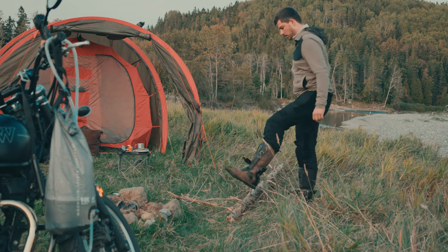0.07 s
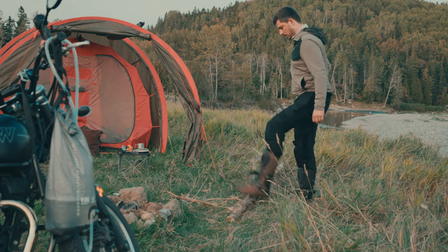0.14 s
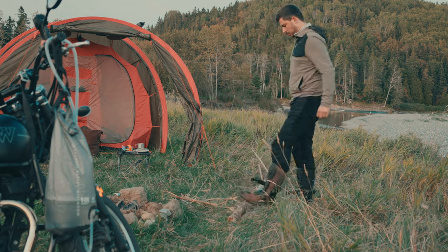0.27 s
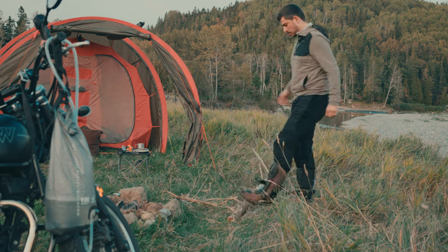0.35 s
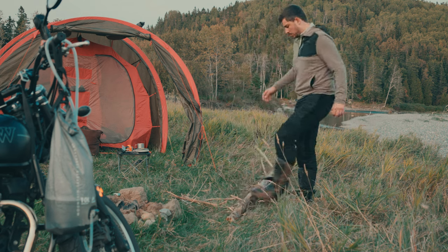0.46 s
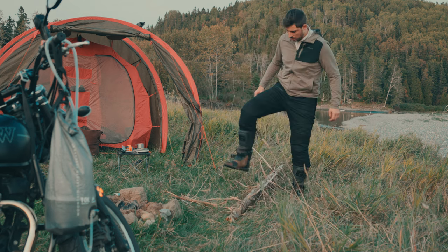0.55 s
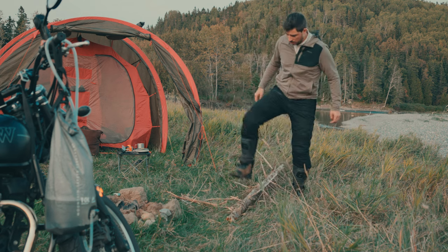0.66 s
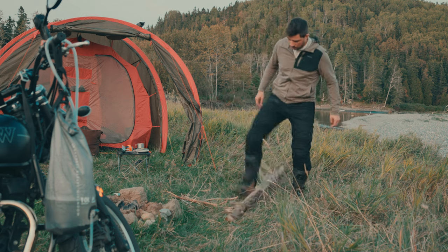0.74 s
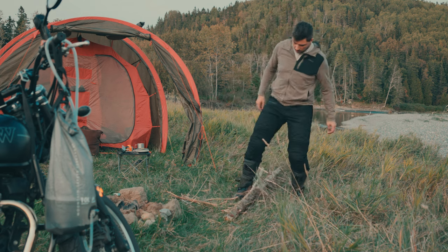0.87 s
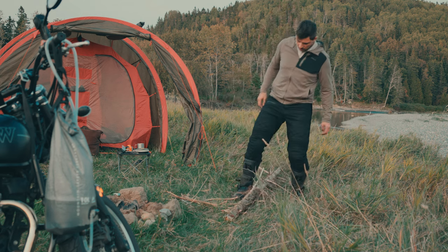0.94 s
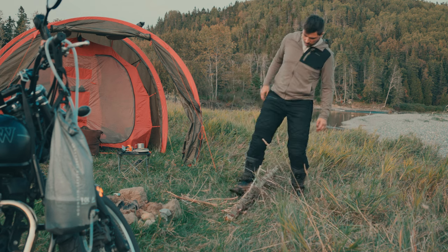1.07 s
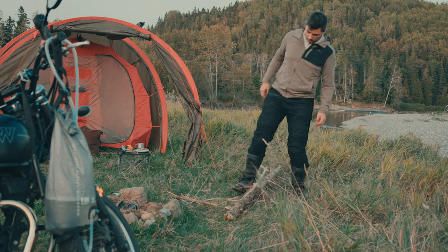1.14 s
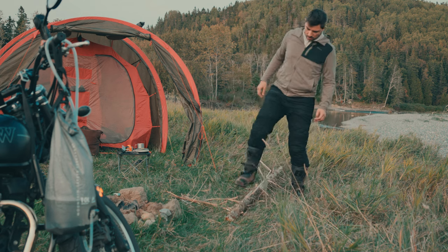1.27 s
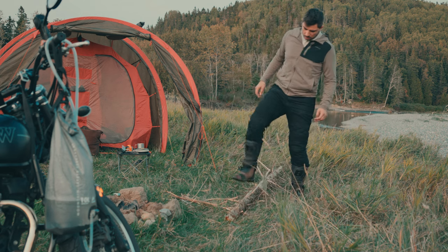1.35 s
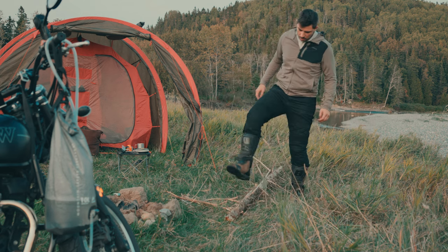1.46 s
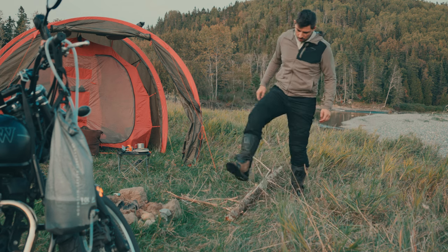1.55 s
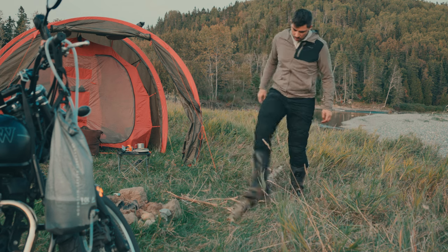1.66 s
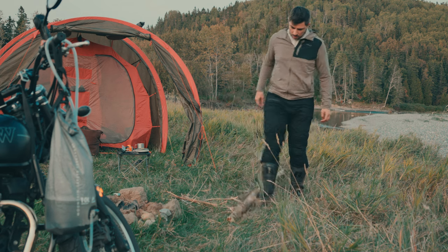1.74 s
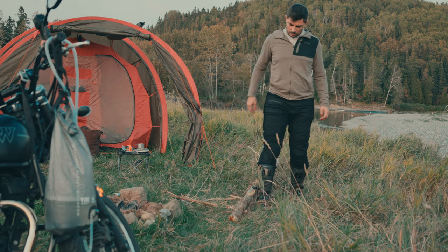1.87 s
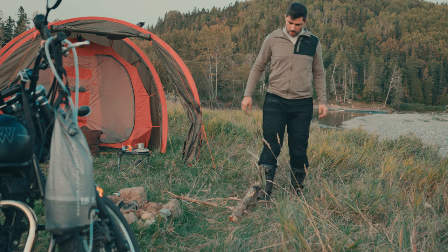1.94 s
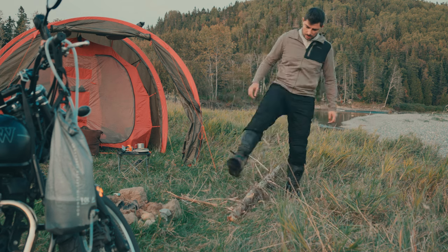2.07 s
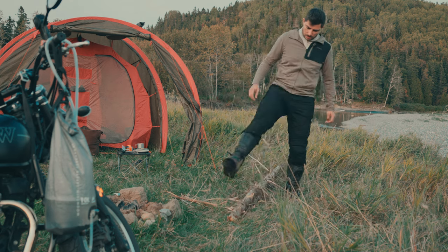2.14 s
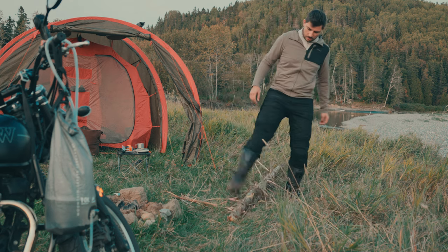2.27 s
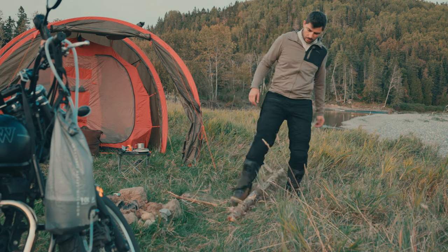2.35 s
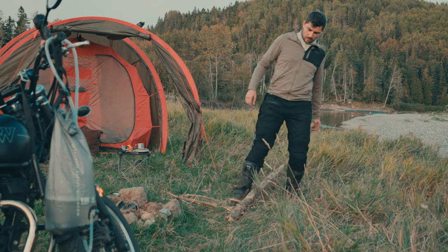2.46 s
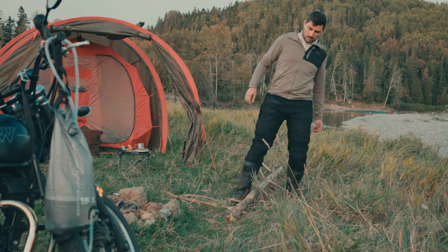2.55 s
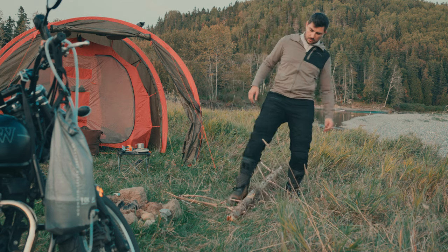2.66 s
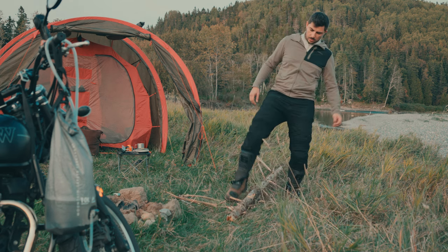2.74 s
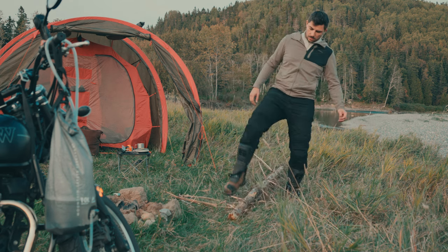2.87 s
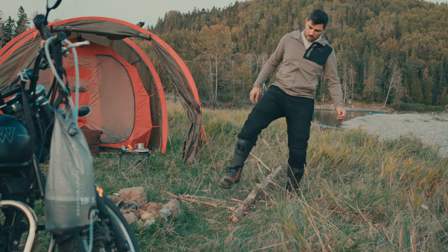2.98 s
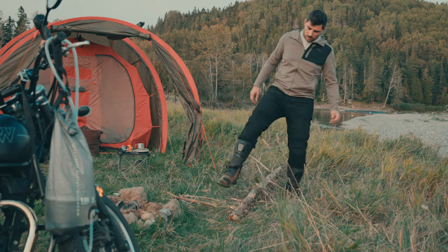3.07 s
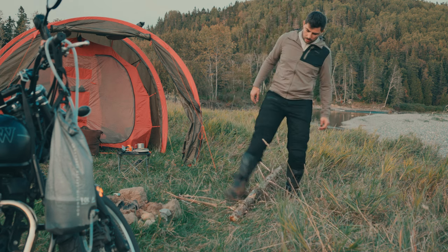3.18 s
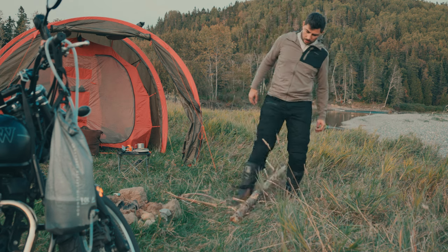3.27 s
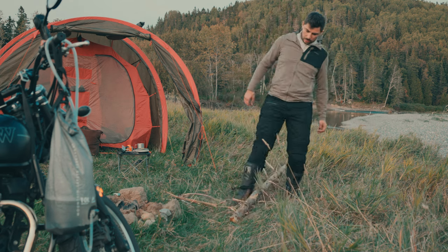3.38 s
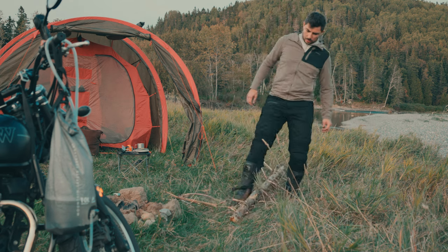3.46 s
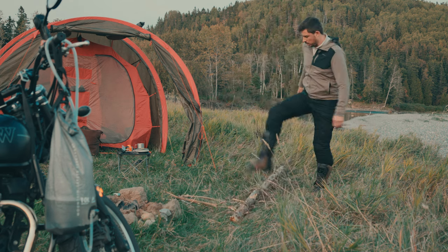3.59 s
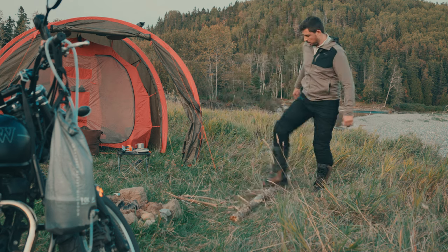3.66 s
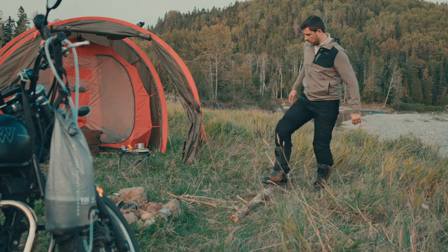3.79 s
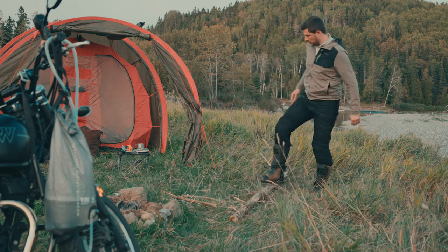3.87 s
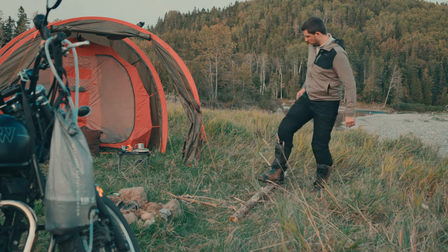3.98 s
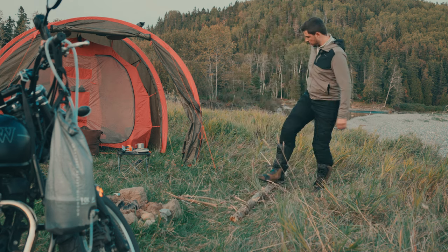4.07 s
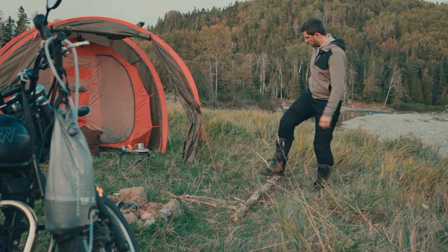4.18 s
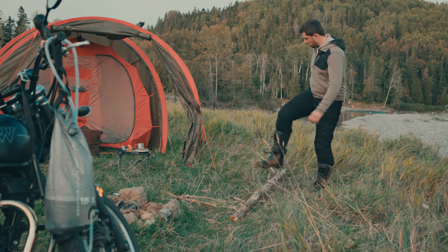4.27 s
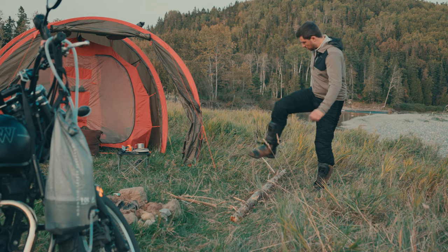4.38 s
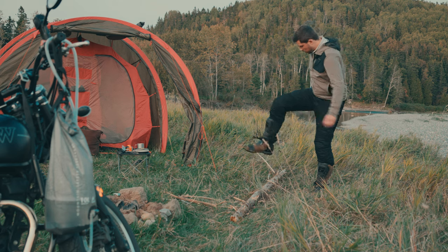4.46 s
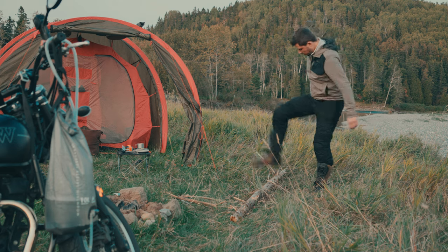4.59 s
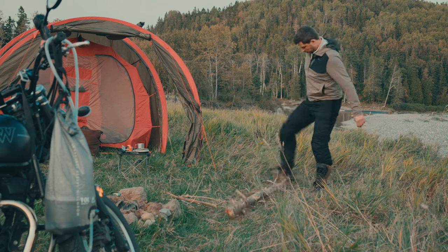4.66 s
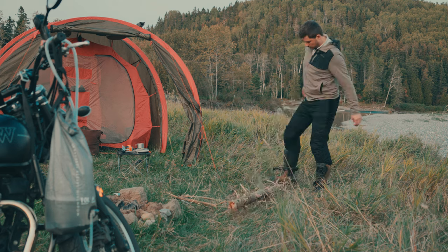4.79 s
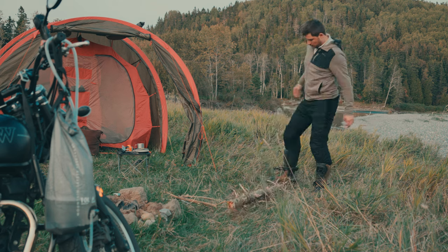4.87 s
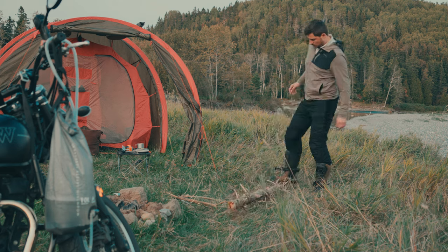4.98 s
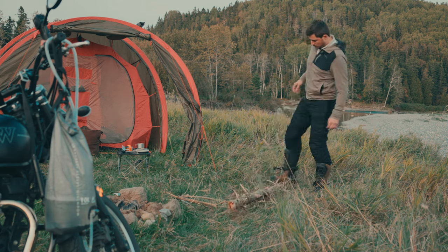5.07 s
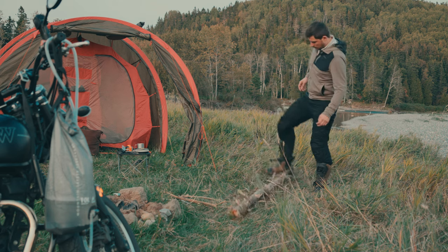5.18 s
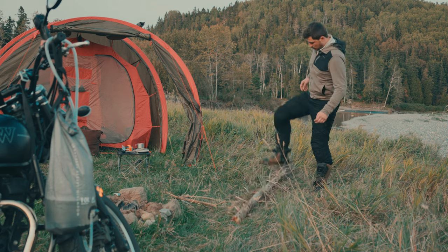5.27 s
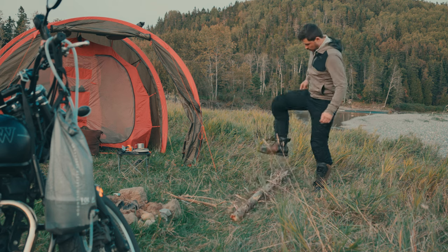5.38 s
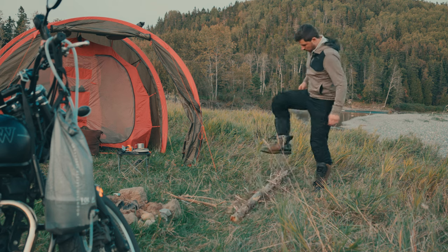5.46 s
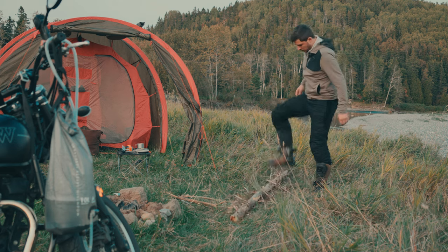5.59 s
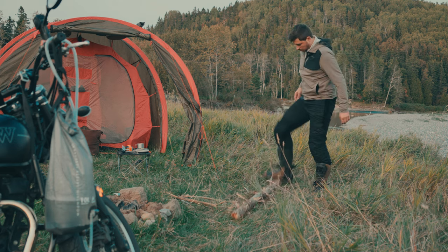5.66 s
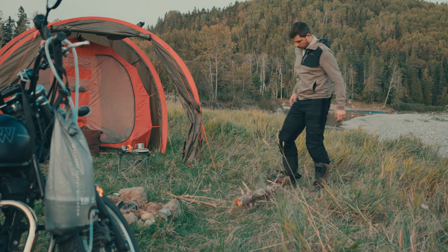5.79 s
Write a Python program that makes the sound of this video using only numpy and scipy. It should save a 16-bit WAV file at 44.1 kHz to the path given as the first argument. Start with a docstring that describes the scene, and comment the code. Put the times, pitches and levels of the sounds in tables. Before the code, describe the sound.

A boot breaks a dry, twiggy log in grass beside a distant river, heard close in open air. Stamps land at about 0.2, 0.75, 1.65, 2.35, 3.25, 3.65, 4.65 and 5.7 seconds. Each is a burst of roughly a tenth of a second: hard, bright snaps of a few milliseconds, splintery crunch, tiny crackles and damped woody knocks with soil thump. The 1.65 stamp is a longer run of snaps; 2.35 is lower and thuddier; 3.65 is the loudest, a hard crack; 4.7 is a dense, powerful cluster; 5.7 is one clean snap with small remnants. The log briefly rings hollow around 1.7, 2.4, 3.3 and 3.7. Small light snaps come near 5.15. Between stamps are soft knocks, faint stalk ticks and grass rustle, clearest near 1.1, 3.9 and 5.25. A smooth quiet river hiss continues throughout, with low wind buffeting that weakens after 3.7.

```python
"""Twigs crack in quick runs as a boot stamps on a dry, twiggy log lying in grass beside a river.
Each crack is noise ringing a twig stub, with a treble click and a splintery crunch.
Knocks are pushes into damped resonances; the log rings in a few decaying sine modes.
Grass is grainy noise that follows the boot, with single stalk ticks on top.
The river is a smooth distant hiss; wind is low noise buffeting the microphone."""
import sys
import numpy as np
from scipy import signal
from scipy.fft import rfft, irfft
from scipy.io import wavfile
from scipy.ndimage import uniform_filter1d

SR = 44100
rng = np.random.default_rng(int(sys.argv[2]) if len(sys.argv) > 2 else 0)


def invert_db(level):
    """Linear amplitude ratio for a level in decibels (20 dB per decade), elementwise."""
    return 10 ** (np.asarray(level, dtype=float) / 20)


def output_pcm(signal):
    """Save a mono or channel-first signal as 16-bit PCM at the path in sys.argv[1].

    Samples are clipped to [-1, 1] before scaling.
    """
    pcm = np.clip(np.atleast_2d(signal).T, -1, 1) * 32767
    wavfile.write(sys.argv[1], SR, np.round(pcm).astype(np.int16))


N = 257102
T = np.arange(N) / SR
BURST = 4096  # samples in one short event

# Stamps of the boot. Each row: start in seconds, length in seconds,
# small-twig peak level in dB before sag and scatter, grass level in dB before its flicker.
STAMPS = [(0.184, .10, -26.5, -50.5), (0.75, .09, -28, -53.5), (1.672, .16, -30, -55.5),
          (2.335, .11, -26.5, -57), (3.235, .11, -29, -58.5), (3.661, .07, -27.5, -52),
          (4.655, .12, -28, -54), (5.70, .07, -34, -50.5)]


def unit(x):
    """Scale to rms 1."""
    return x / np.sqrt(np.mean(x ** 2))


def colour(x, points):
    """Filter by a spectrum of (Hz, relative dB) points, then scale to rms 1."""
    hz, db = np.transpose(points)
    f = np.fft.rfftfreq(len(x), 1 / SR) + 1  # the 1 keeps the logarithm finite
    gain = invert_db(np.interp(np.log(f), np.log(hz), db))
    return unit(irfft(rfft(x) * gain, len(x)))


def curve(rows):
    """Gain over time from (seconds, dB) rows."""
    return invert_db(np.interp(T, *np.transpose(rows)))


def walk(rate):
    """Random levels held 1 / rate seconds and smoothed twice, scaled to rms 1."""
    hold = int(SR / rate)
    steps = rng.standard_normal(N)[np.arange(N) // hold]
    return unit(uniform_filter1d(uniform_filter1d(steps, hold), hold))


def grit(shape, spread_db):
    """Noise whose samples differ widely in size: fibres and stalks letting go one by one."""
    return rng.standard_normal(shape) * invert_db(spread_db * rng.exponential(size=shape))


def ring(x, hz, width_hz):
    """One resonance, gain 1 at its centre."""
    return signal.lfilter(*signal.iirpeak(hz, hz / width_hz, fs=SR), x)


def ring_twice(x, hz, width_hz, broad_hz, second_width_hz):
    """Two resonances in a row, scaled to rms 1."""
    return unit(ring(ring(x, hz, width_hz), broad_hz, second_width_hz))


def add(track, s, burst, db, size=50):
    """Lay a burst on the track, its loudest stretch of size samples as strong as a sine of peak db."""
    power = uniform_filter1d(2 * burst ** 2, size=size)
    i = int(s * SR)
    track[i:i + len(burst)] += (burst * invert_db(db) / np.sqrt(power.max()))[:N - i]


def fade(ms, rise_ms):
    """A smooth rise, then 8 dB lost in every ms milliseconds."""
    t = T[:BURST] * 1000
    return (1 - np.exp(-(t / rise_ms) ** 2)) * invert_db(-8 * t / ms)


def cracks():
    """Tearing fibres ring the twig stub and click broadly; splinters crunch around each break."""
    # The louder twig cracks. Each row: moment in seconds, peak level in dB, stub pitch in Hz,
    # nominal fade in ms (each layer scales it), treble level in dB relative to the peak.
    loud_snaps = [(0.182, -22, 2540, 2, -45), (0.1865, -22.5, 1720, 3.5, -11), (0.191, -25, 2360, 5, -15.5),
                  (0.204, -19.5, 2440, 3.5, -23), (0.2117, -2.5, 3450, 2.5, -18.5),
                  (0.2172, -6.5, 3600, 1.5, -28.5), (0.2282, -16.5, 3310, 4.5, -16),
                  (0.235, -17, 2520, 4.5, -25), (0.282, -29, 3800, 3, -13.5),
                  (0.2894, -33.5, 3810, 2.5, -13), (0.3893, -31, 4100, 1.8, -6.5),
                  (0.7479, -25, 4210, 3, -12.5), (0.761, -24, 2690, 7.5, -23),
                  (0.7834, -17.5, 2870, 3.5, -21.5), (0.7904, -22.5, 3000, 6, -16),
                  (0.7982, -2, 3740, 3, -9.5), (0.8125, -13, 3950, 2, -17), (0.8181, -19.5, 2910, 3, -24.5),
                  (0.8585, -34.5, 3410, 2, -15), (1.6488, -35, 1330, 4, -37), (1.657, -31, 1610, 3, -38),
                  (1.6709, -15.5, 3400, 2.5, -19), (1.68, -25, 3840, 3.0, -13),
                  (1.693, -21.5, 3130, 2.5, -24.5), (1.724, -23.5, 3330, 1.8, -29.5),
                  (1.7316, -9, 3450, 1.5, -31), (1.7367, -15.5, 3340, 3.0, -13),
                  (1.744, -8, 3260, 1.5, -24), (1.7596, -17.5, 3280, 7, -15.5),
                  (1.7763, -16.5, 2810, 3.5, -14.5), (1.7798, -13, 2470, 2.5, -21),
                  (1.7946, -17, 1660, 6, -16.5), (1.8118, -25.5, 2150, 3, -24),
                  (2.336, -22.5, 1150, 3, -35.5), (2.3565, -19, 2920, 1.5, -19),
                  (2.3614, -10, 2100, 2, -29.5), (2.377, -22.5, 2560, 4, -22),
                  (2.3901, -17.5, 1280, 4.5, -22), (2.3961, -21.5, 1210, 7.5, -8.5),
                  (2.4205, -24, 3130, 2, -4.5), (2.478, -35, 1470, 1.9, -30), (3.2364, -24, 1100, 4, -37),
                  (3.244, -25.5, 2500, 1, -16.5), (3.254, -26, 3030, 5, -21.5),
                  (3.2633, -22, 3700, 5, -19.5), (3.2843, -9.5, 2800, 1.5, -25.5),
                  (3.288, -15.5, 2500, 1.5, -22.5), (3.3011, -25, 2270, 4, -23),
                  (3.3564, -33.5, 2840, 3, -22.5), (3.6635, -29, 2440, 9, -16), (3.673, -16, 2500, 3, -22),
                  (3.6754, 0, 3170, 3.5, -21), (3.6814, -9, 4300, 0.5, -14.5), (3.684, -10, 2580, 8, -23),
                  (3.6929, -13.5, 2400, 7.5, -16), (3.71, -18, 3500, 2.2, -21.5),
                  (4.6402, -34, 2700, 3, -17), (4.6614, -22.5, 4160, 2.5, -15.5),
                  (4.6748, -26, 4550, 2.5, -10), (4.684, -24.5, 2780, 2.5, -13),
                  (4.7032, -13, 1500, 4.5, -22), (4.7076, -1.5, 3860, 3, -13.5),
                  (4.7153, -14, 2350, 6.5, -11.5), (4.721, -16, 3000, 8, -11), (4.728, -2.5, 3570, 2, -17),
                  (4.735, -16.5, 1405, 4.5, -19.5), (4.7475, -8, 3500, 3, -20),
                  (4.7512, -9.5, 2640, 2.5, -15.5), (4.7623, -22.5, 2910, 4, -15),
                  (4.86, -34, 2160, 1, -23.5), (5.1315, -24.5, 4500, 1.2, -16.5),
                  (5.1495, -27, 4500, 0.5, -14.5), (5.1622, -31.5, 4040, 1.5, -15),
                  (5.7004, -20, 2300, 4, -18), (5.705, -0.5, 2690, 1.6, -15.5),
                  (5.7134, -24, 2670, 2, -10.5), (5.718, -24, 2470, 5, -11.5), (5.756, -30, 3850, 3, -3),
                  (5.7654, -17.5, 2850, 1.8, -20), (5.7993, -37.5, 1480, 4, -6.5)]
    # Spectrum of the crunch. Each row: frequency in Hz, relative level in dB per Hz.
    splinter_tone = [(150, -7.5), (400, -3), (1000, -2), (1600, -5.5), (3000, -0.5), (5000, -7),
                     (7000, -19), (16000, -36)]
    body_db = -9  # relative to the stub before both are levelled together
    snaps = [*loud_snaps, *twigs()]
    out, load = np.zeros(N), np.zeros(N)
    treble = signal.butter(2, [7000, 14000], "band", fs=SR, output="sos")
    for (s, db, hz, ms, top_db), fibres in zip(snaps, grit((len(snaps), BURST), 3.0)):
        start = s - 0.001
        tear = fibres * fade(0.51 * ms, 0.78)
        stub = ring_twice(tear, hz, 0.29 * hz, hz, 1.37 * hz)
        body = ring_twice(tear, 2500, 2200, 2500, 3500)
        add(out, start, stub + invert_db(body_db) * body, db)
        click = signal.sosfilt(treble, fibres[::-1] * fade(0.5 * ms, 0.62))
        add(out, start, click, db + top_db)
        # the crunch grows more slowly than the crack is loud; short clean breaks leave less of it
        crunch_db = 0.68 * db - 24 + 7 * np.log10(ms / 3)
        add(load, s - 0.006, fade(11, 4.9), crunch_db)  # strain begins before the break
    return out + load * colour(grit(N, 2.4), splinter_tone)


def twigs():
    """Small twigs give way at random moments of each stamp, weaker towards its end."""
    per_second = 40
    sag_db, scatter_db = -8, 2.5
    middle_hz, spread_octaves = 2500, 0.35
    middle_ms, middle_treble_db = 4.5, -20.5  # nominal fade and relative treble, as in the crack rows
    rows = []
    for s, length, db, _ in STAMPS:
        count = int(np.ceil(per_second * length))
        places = (np.arange(count) + rng.random(count)) / count  # 0 to 1 through the stamp
        chances = rng.standard_normal((count, 4)).clip(-2, 2)
        for place, (a, b, c, d) in zip(places, chances):
            peak_db = db + sag_db * place + scatter_db * a
            hz = middle_hz * 2 ** (spread_octaves * b)
            ms = middle_ms * 2 ** (0.6 * c)
            rows.append((s + length * place, peak_db, hz, ms, middle_treble_db + 5 * d))
    return rows


def knocks():
    """A rough quarter-cycle push into a damped low resonance; soil thumps beneath, bark scrapes above."""
    # Knocks of boot and log. Each row: start in seconds, peak level in dB, pitch in Hz,
    # time in ms for the push's roughness to lose 8 dB.
    hits = [(0.1824, -20, 450, 11.5), (0.2115, -14.5, 900, 11), (0.545, -41.5, 150, 9),
            (0.7449, -31, 150, 25), (0.7622, -25, 370, 13), (0.7828, -27.5, 623, 7.5),
            (0.7966, -12, 650, 8), (0.847, -33, 160, 10), (1.0911, -30, 270, 6.5), (1.657, -29, 620, 11),
            (1.6715, -29.5, 430, 27), (1.6972, -23.5, 404, 25), (1.747, -32, 260, 27),
            (1.7788, -20.5, 280, 26), (2.0605, -33.5, 150, 9.1), (2.3367, -15, 402, 8),
            (2.3562, -16.5, 170, 12.3), (2.3787, -29, 240, 25), (2.3915, -16, 800, 7),
            (2.4206, -22, 280, 18), (2.479, -23.5, 210, 8), (2.5193, -34.5, 240, 11), (2.792, -42, 700, 9),
            (2.875, -39, 900, 10), (3.2153, -33.5, 260, 3), (3.2361, -17, 800, 9), (3.2835, -17, 800, 6),
            (3.2849, -18, 297, 23.5), (3.3375, -27.5, 343, 7), (3.3632, -25.5, 240, 7.5),
            (3.575, -39.5, 171, 8.5), (3.6643, -29, 290, 25), (3.6905, -20.5, 390, 12.5),
            (3.775, -40, 170, 9), (4.6648, -29.5, 610, 14), (4.7048, -12.5, 570, 13),
            (4.7257, -17, 510, 11.5), (5.703, -28, 410, 7.5), (5.7413, -40, 420, 6.4),
            (5.763, -32.5, 637, 13), (5.7998, -40, 430, 6)]
    soil_db, bark_db = -3, -8  # relative to the wood; bark also grows with pitch
    out = np.zeros(N)
    for (s, db, hz, ms), jolt in zip(hits, rng.standard_normal((len(hits), BURST))):
        push = fade(250 / hz, 120 / hz) + 0.64 * jolt * fade(ms, 0.65)
        wood = ring_twice(push, hz, 0.9 * hz, hz, 2.5 * hz)
        soil = ring_twice(push, 230, 260, 210, 450)
        scrape = jolt * fade(0.63 * ms, 0.98)
        bark = ring_twice(scrape, 1.9 * hz, 1.3 * hz, 1.9 * hz, 2.5 * hz)
        knock = wood + invert_db(soil_db) * soil + invert_db(bark_db) * hz / 450 * bark
        add(out, s, knock, db, size=176)
    return out


def trunk():
    """The log's few hollow bending modes; where the boot pins it decides which one rings most."""
    # Blows that set the log ringing. Each row: start in seconds,
    # peak level in dB of a mode at the favoured pitch, favoured pitch in Hz.
    blows = [(1.703, -22, 128), (2.398, -21, 279), (2.885, -41, 279), (3.29, -23, 279), (3.358, -37.5, 279),
             (3.688, -22.5, 418)]
    # Bending modes. Each row: frequency in Hz, time in seconds to decay by 60 dB.
    modes = [(128, 0.083), (279, 0.16), (418, .08)]
    off_mode_db_per_octave = -25
    out, t = np.zeros(N), T[:2 * BURST]
    for s, db, best_hz in blows:
        for hz, t60 in modes:
            mode_db = db + off_mode_db_per_octave * abs(np.log2(hz / best_hz))
            envelope = (1 - np.exp(-t / 0.0046)) * invert_db(-60 * t / t60)
            add(out, s, envelope * np.sin(2 * np.pi * hz * t), mode_db, size=176)
    return out


def grass():
    """A fine grainy rustle follows the boot, with a few single stalk ticks."""
    # Faint stalk ticks. Each row: start in seconds, peak level in dB.
    ticks = [(0.3114, -42.5), (0.3174, -42), (0.3481, -44), (0.4695, -49), (0.735, -40), (1.039, -48.5),
             (1.075, -49), (1.138, -41), (1.1474, -46), (2.0494, -53), (2.8724, -51.5), (3.758, -44),
             (3.7858, -44), (3.841, -48), (4.2018, -49), (4.2662, -51)]
    # Spectrum of the rustle. Each row: frequency in Hz, relative level in dB per Hz.
    rustle_tone = [(1000, -14), (2500, 0.5), (5000, 1.5), (8000, -4.5), (12000, -8), (16000, -9)]
    flicker = invert_db(2.5 * walk(45))
    out = brushing() * flicker * colour(grit(N, 2.5), rustle_tone)
    for (s, db), stalk in zip(ticks, rng.standard_normal((len(ticks), BURST))):
        add(out, s, ring(stalk * fade(1.1, 0.5), 4500, 7000), db)
    return out


def brushing():
    """Grass is crushed during a stamp, springs back fast and settles slowly; sweeps swell and fade."""
    # The boot sweeps through the grass between stamps. Each row: middle in seconds,
    # half length in seconds (gain down to 1/e), level in dB before the flicker.
    sweeps = [(0.482, 0.066, -68), (1.12, 0.13, -65.5), (2.0, .06, -74), (2.881, .07, -71),
              (3.19, 0.034, -74), (3.91, 0.068, -62.5), (4.208, .07, -73), (4.98, .1, -74),
              (5.26, 0.14, -62.5), (5.45, 0.063, -72.5)]
    still_db, settle_db = -85, -16  # settling is relative to the stamp
    rise_s, drop_s, settle_s = 0.005, 0.03, 0.18
    gain = invert_db(still_db)
    for s, half, db in sweeps:
        gain = gain + invert_db(db) * np.exp(-((T - s) / half) ** 2)
    for s, length, _, db in STAMPS:
        before = np.maximum(s - T, 0)
        after = np.maximum(T - s - length, 0)
        back = np.exp(-after / drop_s) + invert_db(settle_db) * np.exp(-after / settle_s)
        gain = gain + invert_db(db) * np.exp(-before / rise_s) * back
    return gain


def river():
    """Distant smooth hiss that swells slightly: coloured noise with slow and quicker level drift."""
    # Spectrum of the hiss. Each row: frequency in Hz, relative level in dB per Hz.
    hiss_tone = [(120, -38.5), (200, -8), (400, -5), (800, 0), (1600, -3), (2560, -2), (4270, -12.5),
                 (5200, -14), (6700, -30.5), (9000, -36.5), (16000, -46)]
    level_db = -51 + 0.72 * walk(1.5) + 0.5 * walk(12)
    return invert_db(level_db) * colour(grit(N, 0.97), hiss_tone)


def wind():
    """Low buffeting of the microphone; stronger gusts flutter higher."""
    # Gusts on the microphone. Each row: time in seconds, level of the low rumble in dB.
    gust = curve([(0.0, -36), (0.2, -34), (0.5, -34.5), (0.7, -38), (1.02, -41), (1.4, -38.5), (1.7, -35.5),
                  (2.1, -35.5), (2.6, -35.5), (3.2, -36), (3.55, -37), (3.74, -45), (4.1, -46), (4.27, -40),
                  (4.45, -46.5), (4.9, -39), (5.4, -42), (5.83, -50)])
    # Spectrum of the rumble. Each row: frequency in Hz, relative level in dB per Hz.
    rumble_tone = [(10, -31.5), (20, -8.5), (32, -2), (45, -0.5), (58, -6.5), (80, -24.5), (120, -38),
                   (200, -46.5), (300, -62.5), (500, -90)]
    rumble = colour(rng.standard_normal(N), rumble_tone)
    flutter_tone = [(30, -29.5), (62, 0.5), (85, -7.5), (130, -20), (300, -51.5), (700, -110)]
    flutter = colour(rng.standard_normal(N), flutter_tone)
    flutter_gain = invert_db(-9.0 + 2.5 * walk(6)) * unit(gust ** 0.54)
    return gust * (rumble + flutter_gain * flutter)


def scene():
    """All sources in the open air; the boot and log sounds bounce once off the ground."""
    near = cracks() + knocks() + trunk()
    bounce = invert_db(-16.5) * np.roll(near, int(0.0021 * SR))
    return (near + bounce + grass() + river() + wind())[None]


def band_limit(x):
    """A steep low-pass at the top of the band."""
    return signal.sosfilt(signal.butter(12, 16440, fs=SR, output="sos"), x)


def record(dry):
    """Peaks beyond full scale are clipped flat."""
    mix = np.clip(dry, -1, 1)
    return band_limit(mix)


dry = scene()
out = record(dry)
output_pcm(out)
```